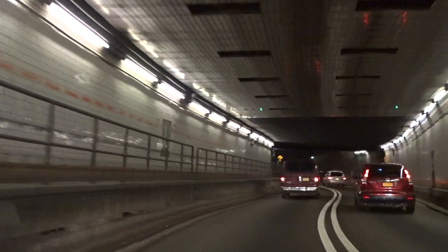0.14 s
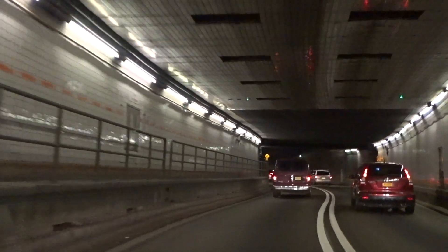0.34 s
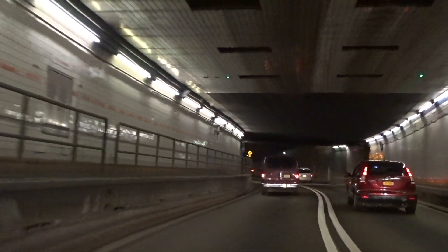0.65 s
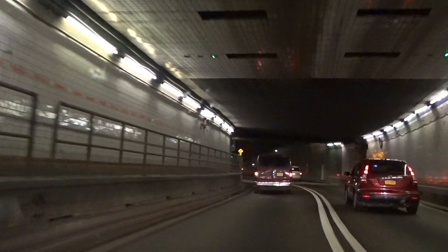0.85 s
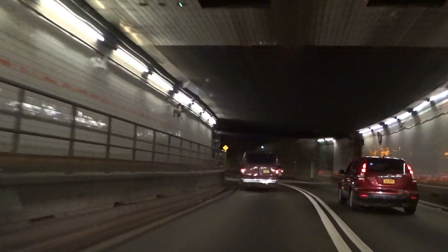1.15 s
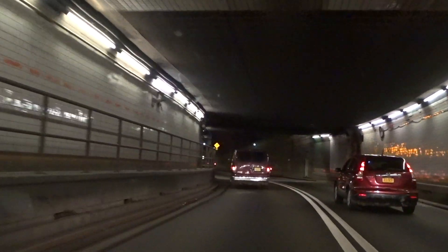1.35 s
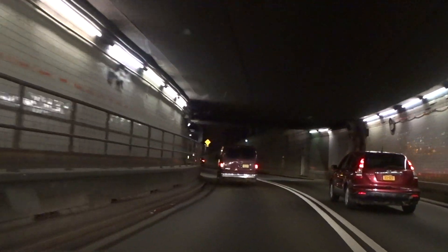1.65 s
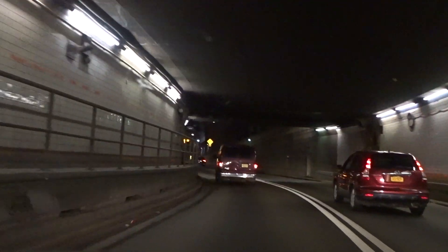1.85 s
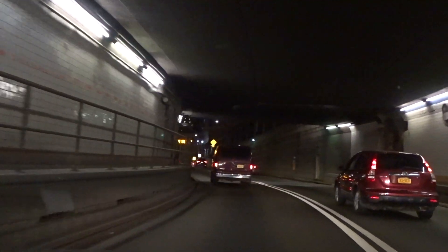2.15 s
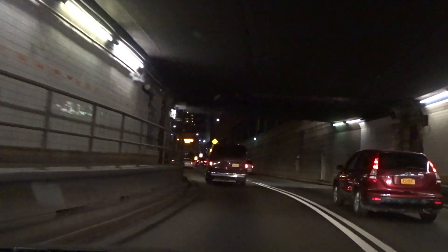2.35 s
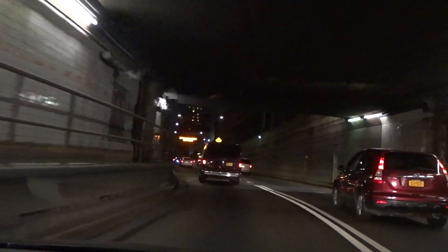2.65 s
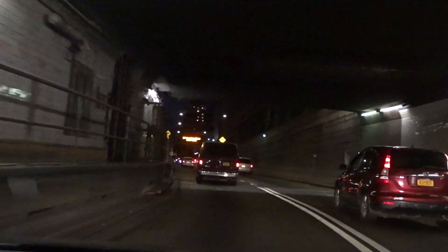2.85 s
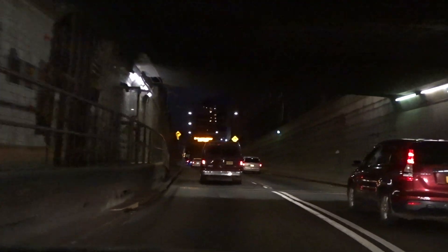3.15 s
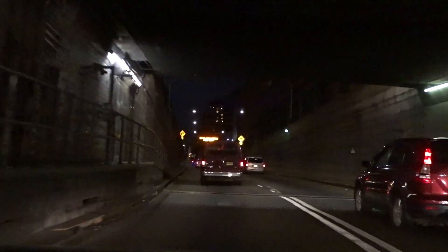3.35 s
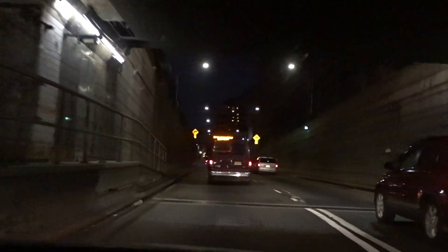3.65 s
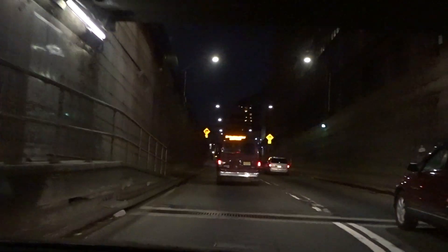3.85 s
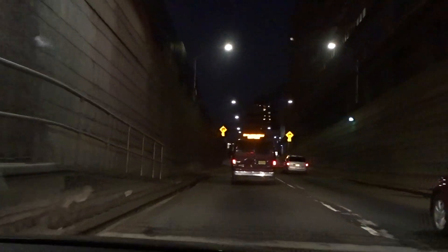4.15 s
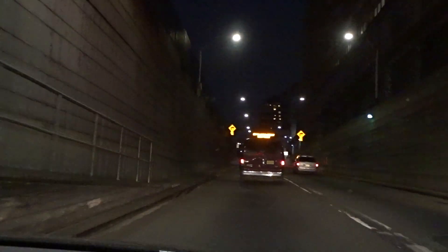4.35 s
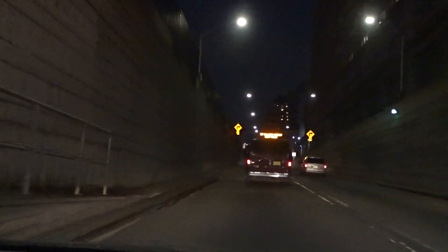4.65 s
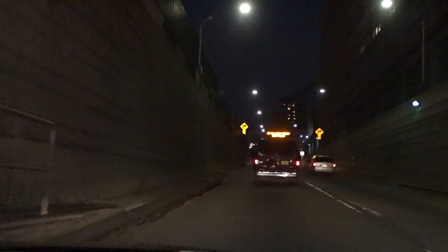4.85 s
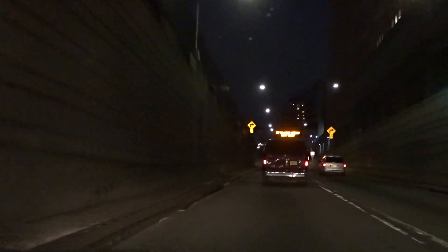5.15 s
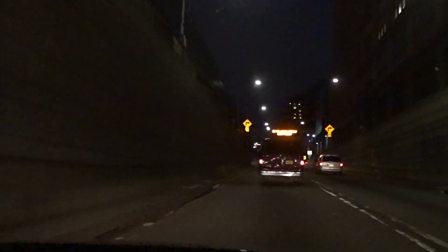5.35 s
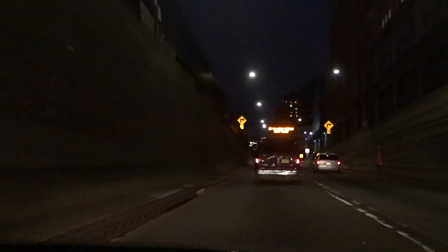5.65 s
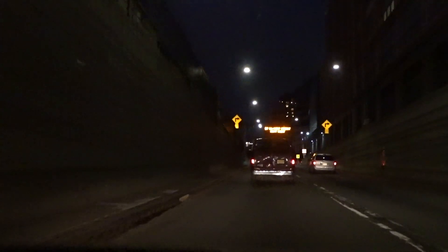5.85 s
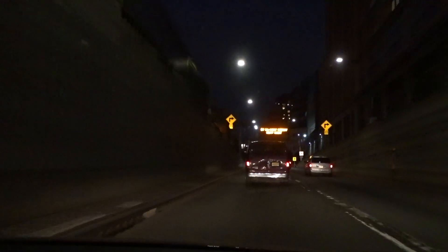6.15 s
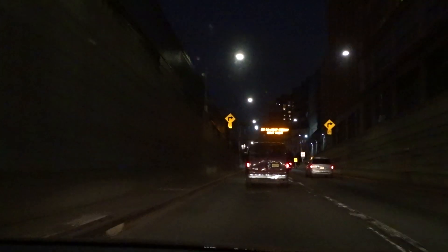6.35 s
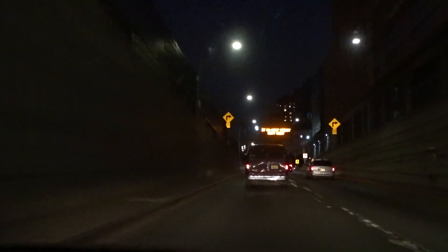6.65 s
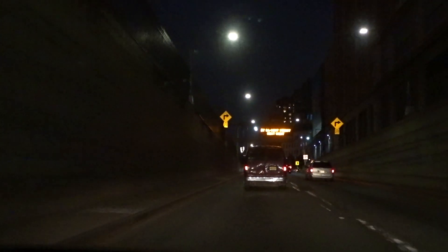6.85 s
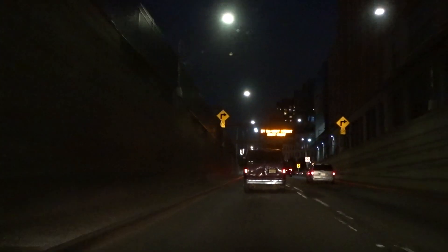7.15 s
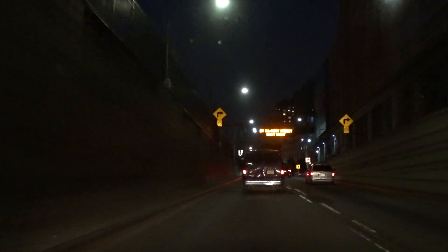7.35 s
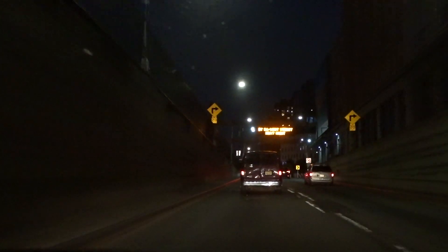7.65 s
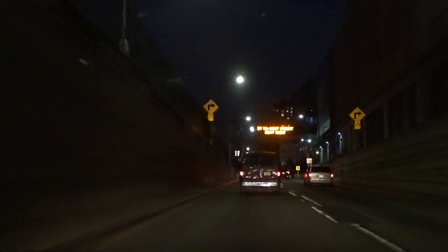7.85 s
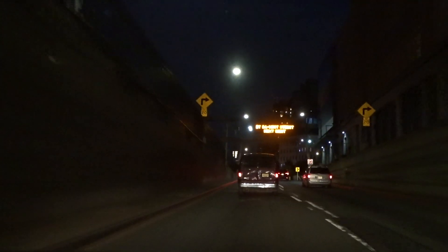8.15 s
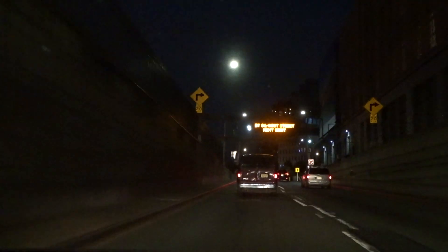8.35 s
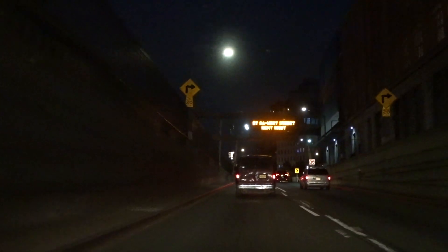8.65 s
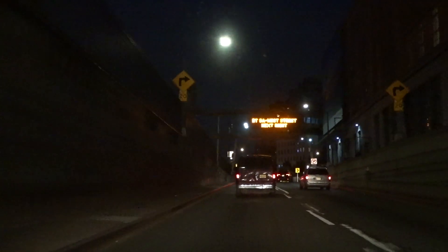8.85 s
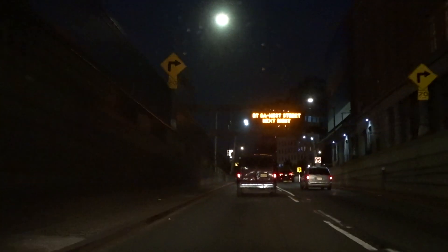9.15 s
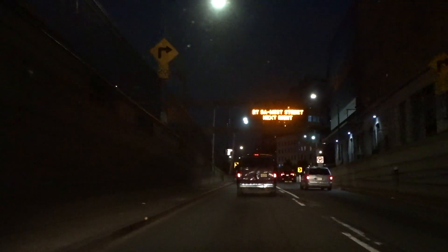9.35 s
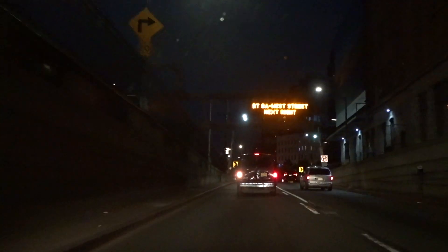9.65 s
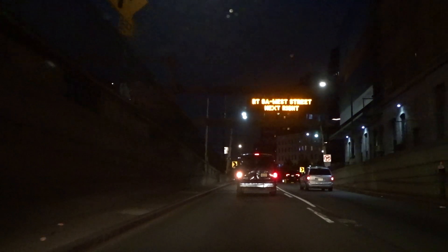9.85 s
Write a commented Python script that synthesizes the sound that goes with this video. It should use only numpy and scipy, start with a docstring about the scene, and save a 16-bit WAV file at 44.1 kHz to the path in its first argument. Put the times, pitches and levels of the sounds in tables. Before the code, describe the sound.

Inside a car leaving a tunnel, low road boom and tyre roar swell, then thud over joints and settle into quieter, duller rumble with faint trim clicks.

```python
"""Road noise booms in the resonances of a car cabin, as shaped noise in levels that follow the paving.
The car leaves a tunnel for an open, walled ramp: wash and hiss, also shaped noise, fall away.
Sine drones give the engine and a low hum; narrow noise gives a roar that blooms and drops, and a gear whine.
Decaying noise thuds over joints, a gated sine zips over a grating, and damped modes click in the plastic trim.
Noise with uneven envelopes rattles, sizzles, squeaks and rustles softly on the dashboard."""
import sys
import numpy as np
from scipy import signal
from scipy.fft import rfft, irfft, next_fast_len
from scipy.io import wavfile
from scipy.ndimage import uniform_filter1d, map_coordinates

SR = 44100
rng = np.random.default_rng(int(sys.argv[2]) if len(sys.argv) > 2 else 0)


def bounce(signal):
    """Save signal as a 16-bit WAV file at the path given by the first command-line argument."""
    frames = np.transpose(np.atleast_2d(signal))
    limited = np.clip(frames, -1, 1)
    pcm = np.round(limited * 32767).astype(np.int16)
    wavfile.write(sys.argv[1], SR, pcm)


N = 440559

TOP_HZ = 11070  # upper band limit of the sound
# the jolt that shakes loose parts
JOLT_S, JOLT_LENGTH_S = 4.68, .4

# hiss spectrum of door seals and dull rubbing: frequency_hz, density_db
HISS_SPECTRUM = [(1500, -33), (2400, -0.5), (2900, 0.5), (3400, 0), (4000, -2), (4500, -7), (5200, -11),
                 (7000, -9), (11000, -29)]
# vibration modes of plastic trim: frequency_hz, level_db, t60_s
TRIM_MODES = [(1264, -5, 0.027), (1610, -5, 0.027), (1970, -1, .025), (2224, 1.5, 0.026),
              (2870, -3.5, 0.033), (3020, -1.5, 0.023), (3590, -7, 0.024), (3950, -4, 0.024),
              (4710, -9.5, .02), (5800, -13.5, 0.018), (7400, -10, 0.021), (8090, -10, 0.021),
              (8730, -6, 0.027), (9500, -13.5, 0.013), (10960, -16, 0.014)]


def amp(db):
    """Level to amplitude ratio: 20 dB is a factor of ten."""
    return 10 ** (np.asarray(db) / 20)


def unit(x):
    """Normalization by effective value: rms becomes 1."""
    return x / np.sqrt(np.mean(x ** 2) + 1e-20)


def along(points, hz):
    """Logarithmic frequency scale: (Hz, value) points joined by lines over log frequency."""
    f, v = np.transpose(points)
    return np.interp(np.log(hz + 1), np.log(f + 1), v)


def curves(rows):
    """Linear interpolation in time: one value per sample for each column after the time."""
    s, *cols = np.transpose(rows)
    return [np.interp(np.arange(N) / SR, s, c) for c in cols]


def wobble(rate):
    """Band-limited random modulation: a smooth curve through rate random knots a second."""
    knots = rng.standard_normal(int(N * rate / SR) + 4)
    return map_coordinates(knots, [np.arange(N) * rate / SR])


def swell(middle, half):
    """Gaussian envelope: 1 at its middle, 1/e at half seconds either side."""
    return np.exp(-((np.arange(N) / SR - middle) / half) ** 2)


def step(middle, fade):
    """Sigmoid transition: a soft change from 0 to 1 with time scale fade."""
    return .5 + .5 * np.tanh((np.arange(N) / SR - middle) / (2 * fade))


def filtered(x, response):
    """Linear filtering: the spectrum of x is multiplied by a response of frequency."""
    size = x.shape[-1]
    m = next_fast_len(size + SR // 2)
    return irfft(rfft(x, m) * response(np.fft.rfftfreq(m, 1 / SR)), m)[..., :size]


def add(track, s, sound):
    """Superposition: a sound is added to the track from time s."""
    part = track[..., round(s * SR):][..., :sound.shape[-1]]
    part += sound[..., :part.shape[-1]]


def peaks(modes, hz):
    """Resonance: gains of (Hz, half width Hz, dB) modes summed in power."""
    gains = [amp(db) / (1 + ((hz - fc) / width) ** 2) for fc, width, db in modes]
    return np.sqrt(sum(gain ** 2 for gain in gains))


def rush(gain):
    """Stereo coherence: shaped noise with a mid part of rms 1 and a side part weighted by frequency."""
    # side relative to mid: frequency_hz, side_minus_mid_db
    side_levels = [(30, -22), (75, -23), (120, -26.5), (230, -18.5), (450, -17), (660, -11), (1000, -12.5),
                   (1400, -8), (2500, -7.5), (5000, -8), (7400, -11), (10500, -4.5)]

    def mid_side_gain(hz):
        """Spectral weighting: mid and side share a colour, and the side takes its own level."""
        return gain(hz) * np.array([np.ones_like(hz), amp(along(side_levels, hz))])

    mid, side = filtered(rng.standard_normal((2, N)), mid_side_gain)
    return np.array([mid + side, mid - side]) / np.std(mid)


def random_ripple(hz, depth_db=1.4, spacing_hz=45):
    """Random spectral ripple: small peaks and dips, drawn afresh for each noise and steady in time."""
    knots = rng.standard_normal(SR // 16)
    ripple = map_coordinates(knots, [hz / spacing_hz], mode="mirror")
    onset = np.clip(hz / 600 - 1, 0, 1)  # none below 600 Hz, full from 1200 Hz
    return amp(depth_db * onset * ripple)


def coloured(spectrum):
    """Spectral shaping: stereo noise follows a given spectrum with a random ripple."""
    return rush(lambda hz: amp(along(spectrum, hz)) * random_ripple(hz))


def even(x, size=SR // 4):
    """Level equalization: division by running rms removes slow chance swells and keeps fast flutter."""
    power = np.abs(uniform_filter1d(np.mean(x ** 2, axis=0), size))
    return x / np.sqrt(power + 1e-12)


def paving():
    """Surface excitation: boom, roar and shake levels (dB) follow the paving under the tyres."""
    # stretches, each lasting until the next: start_s, boom_db, roar_db, shake_db
    stretches = [(0, -26, -29, -38), (2.55, -24, -28.5, -38), (3.75, -21.5, -28, -36),
                 (4.9, -24.5, -31, -31.5), (5.7, -26, -29.5, -36), (6.55, -24, -29, -37),
                 (7.9, -25.2, -29.5, -37.5), (9.1, -24, -28.5, -40.5)]
    blend_s = 0.32  # one surface gives way to the next
    starts, *levels = np.transpose(stretches)
    under = np.maximum(np.searchsorted(starts, np.arange(N) / SR) - 1, 0)
    return uniform_filter1d(np.array(levels)[:, under], round(blend_s * SR))


def road(boom_waver_db=0.72, roar_waver_db=0.73):
    """Forced vibration: rough asphalt shakes the body, rings the cabin air and roars in the tread."""
    # cabin air and tyre cavity resonances: frequency_hz, half_width_hz, level_db
    cavity_modes = [(105.3, 10.5, 0.5), (121, 27.4, 2.5), (164.5, 9.3, 2), (175.2, 20, -0.5),
                    (228.6, 8.2, -1.1), (265.3, 13, -7.5)]
    # body vibration spectrum: frequency_hz, density_db
    body_spectrum = [(8, -20), (18, -5), (27, -4), (36, 4), (43, 7), (56, -4.5), (75, -9.5), (100, -4.5),
                     (160, -58)]
    # tyre roar spectrum: frequency_hz, density_db
    tyre_spectrum = [(150, -56), (215, -8.5), (270, -5), (305, -2.5), (340, -1), (358, 4), (385, -3.5),
                     (420, -3), (455, -4), (510, -9.5), (600, -20.5), (750, -23.5), (1200, -73)]
    # road dips that rock the body: middle_s, level_db
    road_dips = [(1.29, -33.5), (3.42, -29.5), (4.91, -20), (7.9, -32), (9.47, -33), (9.94, -30)]
    rock_s = .06  # half length of one rocking
    boom_db, roar_db, shake_db = paving()
    rocking = sum(amp(db) * swell(s, rock_s) for s, db in road_dips)
    boom = amp(boom_db + boom_waver_db * wobble(4)) * even(rush(lambda hz: peaks(cavity_modes, hz)))
    shaking = np.hypot(amp(shake_db), rocking) * even(coloured(body_spectrum))
    roar = amp(roar_db + roar_waver_db * wobble(4)) * even(coloured(tyre_spectrum))
    return boom + shaking + roar


def drone(pitch, gain, waver_db, drift_hz):
    """Periodic tone: a sine of rms gain wavers in level and drifts in frequency."""
    phase = 2 * np.pi * np.cumsum(pitch + drift_hz * wobble(9)) / SR
    return np.sqrt(2) * gain * amp(waver_db * wobble(6)) * np.sin(phase)


def engine():
    """Firing frequency: the car's own engine hums in and out of the road boom."""
    # firing tone: time_s, pitch_hz, level_db
    firing = [(0, 102.8, -32.5), (.95, 100, -27), (1.6, 101.3, -34), (3, 106.6, -35.5), (4.1, 105.8, -31.5),
              (5.1, 102.3, -41), (6.1, 105.1, -28), (8.1, 105.1, -43.5), (8.65, 95.2, -26.5),
              (9, 100.2, -43), (9.28, 107, -28), (10, 109, -44)]
    pitch, level = curves(firing)
    return drone(pitch, amp(level), waver_db=2, drift_hz=1.83)


def thuds(attack_s=0.011, spread=0.54, left_db=1.8):
    """Impact and damping: a wheel meets a joint and the suspension shudders, stronger on the left."""
    # joint impacts, before doubling and stereo balance: start_s, level_db, pitch_hz, t60_s
    joints = [(3.921, -15.5, 160, 0.2), (4.271, -23, 158, 0.3), (4.699, -17.5, 114, 0.44),
              (4.907, -18, 65.4, 0.22)]
    out, t = np.zeros(N), np.arange(SR // 2) / SR
    for s, db, pitch, t60 in joints:
        def band(hz):
            """Broad resonance: the half-gain width is a fraction of its pitch."""
            return 1 / (1 + ((hz - pitch) / (spread * pitch)) ** 4)

        shudder = even(filtered(rng.standard_normal(len(t)), band)[None], size=SR // 20)[0]
        envelope = amp(db - 60 * t / t60) * (1 - np.exp(-t / attack_s))
        add(out, s, 2 * envelope * shudder)
    return out * amp([[left_db], [-left_db]])


def grating(level_db=-26.0):
    """Passage frequency: evenly spaced steel bars make the tread sing at the bar rate."""
    start_s, length_s, bar_hz, edge_s = 4.601, .031, 803, .003
    t = np.arange(N) / SR - start_s
    contact = np.clip(np.minimum(t, length_s - t) / edge_s, 0, 1)
    return amp(level_db + wobble(370)) * contact * np.sin(2 * np.pi * bar_hz * t)


def blooming_roar():
    """Resonant swell: a roar near 230 to 540 Hz blooms by the tunnel mouth and drops as the roof ends."""
    # roar resonances, the lowest a cabin mode that the tunnel excites:
    # frequency_hz, half_width_hz, level_db
    roar_modes = [(230, 8.3, 2.5), (269, 35, -7.5), (383.5, 28, 2), (452, 23, -2), (544, 49, -10.5)]
    peak_s, rise_s, fall_s, peak_db = 2.84, 0.78, 0.28, -26.5
    hum_s, hum_half_s, hum_hz, hum_db = 2.5, 0.38, 67.2, -35.5
    t = np.arange(N) / SR - peak_s
    attenuation = np.hypot(1, t / np.where(t < 0, rise_s, fall_s))  # 1 at the loudest moment
    roar = amp(peak_db) / attenuation * even(rush(lambda hz: peaks(roar_modes, hz)))
    # a low hum swells with it
    hum_gain = amp(hum_db) * swell(hum_s, hum_half_s)
    return roar + drone(hum_hz, hum_gain, waver_db=-0.5, drift_hz=.7)


def ticks(start, length, db, colour, count, scatter_db=2):
    """Stratified chance: one faint contact falls at random in each equal slice, as a click row."""
    return [(start + (k + when) * length / count, db + scatter_db * (2 * force - 1), *colour)
            for k, (when, force) in enumerate(rng.random((count, 2)))]


def contacts():
    """Random impacts: the clear clicks, stray ticks along the drive and a flurry after the jolt."""
    # trim contacts, level being rms of the first 4 ms:
    # start_s, level_db, favoured_hz, fall_db_per_octave, crack_t60_s
    clear = [(.1625, -43, 5000, -1, 0.018), (.1786, -17.5, 3300, 2.5, .013), (1.913, -46, 7000, 13, .025),
             (1.963, -52, 9000, 31, .03), (2.525, -38, 3500, 13, .011), (2.5337, -33, 3460, 16.5, .01),
             (2.9948, -42.5, 2800, 5.5, .027), (3.878, -49.5, 7000, 5, .025),
             (4.449, -47.5, 4800, 11, .012), (4.644, -33, 5800, 7, .04), (4.6756, -44.5, 6000, 8, 0.01),
             (4.7144, -35.5, 6470, 2, 0.044), (4.782, -47, 4800, 9, .015), (4.823, -44, 5960, 7, .015),
             (4.9408, -42.5, 6460, 3, 0.054), (4.962, -35.5, 6800, 19.5, 0.048),
             (5.811, -46, 2000, 10, .066), (7.7924, -49.5, 4570, 11, .014), (8.076, -42, 6800, 1.5, .022),
             (8.58, -50, 6200, 5.5, .018), (9.269, -52, 6500, 10, .016), (9.5483, -42.5, 2500, 4, .012)]
    # colours: favoured Hz, fall in dB per octave, crack t60 in s
    stray = ticks(0, N / SR, -52, (7000, 12.5, .022), count=8)
    flurry = ticks(JOLT_S, JOLT_LENGTH_S, -52.5, (6000, 1, .012), count=9)
    return list(clear) + stray + flurry


def plastic(hz):
    """Spectral envelope with absorption: a crack follows the trim modes, less a narrow notch."""
    notch_hz, notch_width_hz, notch_db = 4840, 420, -3
    notch = notch_db * np.exp(-((hz - notch_hz) / notch_width_hz) ** 2)
    envelope = [(700, -42)] + [row[:2] for row in TRIM_MODES]
    return amp(along(envelope, hz) + notch) * (hz < TOP_HZ)


def trim(crack_db=6, tail_db=-14, tail_t60=0.086, side_db=-7, attack_s=0.00025):
    """Modal ringing: contacts excite damped plastic modes, a crack and the cabin's brief answer."""
    out, t = np.zeros((2, N)), np.arange(SR // 8) / SR
    hz, level, t60 = np.transpose(TRIM_MODES)[:, :, None]
    for s, db, centre, fall, crack_t60 in contacts():
        # the offset from rng is a phase in cycles, a fraction of a turn
        modes = amp(level - 60 * t / t60) * np.sin(2 * np.pi * (hz * t + rng.random(hz.shape)))
        ring = np.sum(modes, axis=0)
        fade = amp(crack_db - 60 * t / crack_t60) + amp(tail_db - 60 * t / tail_t60)
        mid, side = fade * unit(filtered(rng.standard_normal((2, len(t))), plastic))
        pair = ring + mid + amp(side_db) * np.array([side, -side])
        pair = pair * (1 - np.exp(-t / attack_s))
        # small, hard parts favour the high modes, large ones the low
        pair = filtered(pair, lambda f: amp(-fall * np.abs(np.log2((f + 1) / centre))))
        add(out, s, amp(db) * pair / np.std(pair[:, :SR // 250]))
    return out


def jolt_rattle(level_db=-53.0, grain_db=5.0, taper=0.33):
    """Dense impacts merge into noise: the joint shakes loose parts into a grainy rattle."""
    # frequency_hz, density_db
    spectrum = [(900, -23), (2000, 4), (3200, -6), (5000, -10), (7000, -8.0), (11000, -20.5)]
    envelope = np.zeros((2, N))
    add(envelope, JOLT_S, signal.windows.tukey(round(JOLT_LENGTH_S * SR), taper)[None])
    grains = unit(amp(grain_db * wobble(330)))
    return amp(level_db) * envelope * grains * coloured(spectrum)


def leaving(tunnel_db, open_db):
    """Equal-power crossfade: gains of tunnel and open-air parts as the car drives out."""
    exit_s, fade_s = 4.45, 0.39  # middle and time scale
    out = step(exit_s, fade_s)
    return amp(tunnel_db) * np.sqrt(1 - out), amp(open_db) * np.sqrt(out)


def outside(flutter_db=0.48, follow=0.65):
    """Transmission: wall-reflected wash enters by glass and seals; outdoors it follows the tyre roar."""
    # wash spectrum in the tunnel: frequency_hz, density_db
    tunnel_spectrum = [(350, -17.5), (560, -2.5), (680, -2), (820, 0.5), (1000, -1.5), (1150, -3.5),
                       (1320, -10.5), (1600, -14.5), (2000, -18), (2500, -22.5), (3200, -39.5),
                       (5000, -58.5)]
    # wash spectrum in the open: frequency_hz, density_db
    open_spectrum = [(350, -26), (560, 0), (680, 0.5), (820, -0.5), (1000, -1), (1150, -3.5), (1320, -10.5),
                     (1600, -14), (2000, -16.5), (2500, -23.5), (3200, -30), (5000, -61.5)]
    tunnel, ramp = leaving(tunnel_db=-35.2, open_db=-40.5)
    roar_db = paving()[1]
    ramp = ramp * amp(follow * (roar_db - roar_db.mean()))
    air = np.hypot(*leaving(tunnel_db=-54.5, open_db=-62.5))
    wash = tunnel * coloured(tunnel_spectrum) + ramp * coloured(open_spectrum)
    return amp(flutter_db * wobble(14)) * (wash + air * coloured(HISS_SPECTRUM))


def squeaks(half_width_hz=420, grain_db=4):
    """Stick-slip friction: plastic rubs plastic in a thin, grainy whistle of narrow-band noise."""
    # rubs of plastic: start_s, length_s, level_db, pitch_hz
    slips = [(0.035, 0.12, -63.5, 8900), (0.035, .09, -59.5, 6900), (2.04, .08, -55.5, 9060),
             (2.164, .14, -63.5, 10100), (5.734, 0.073, -61.5, 8960), (5.741, 0.055, -62, 5700)]
    out = np.zeros(N)
    for s, length, db, pitch in slips:
        envelope = signal.windows.tukey(round(length * SR))
        whistle = filtered(rng.standard_normal(SR // 4), lambda hz: peaks([(pitch, half_width_hz, 0)], hz))
        add(out, s, amp(db) * envelope * unit(whistle)[:len(envelope)])
    return out * amp(grain_db * wobble(250))


def whine(half_width_hz=4, pitch_hz=679):
    """Narrow-band noise: a faint, fuzzy gear tone rises out of the noise and sinks again."""
    middle_s, half_s, level_db = 8.1, 2.1, -49
    tone = rush(lambda hz: peaks([(pitch_hz, half_width_hz, 0)], hz))
    return amp(level_db) * swell(middle_s, half_s) * tone


def rustle(grain_db=1.2, clump_db=1, body_db=-2):
    """Sliding friction: grainy rubbing on the dashboard; each slide swells it and adds duller hiss."""
    # rubbing spectrum: frequency_hz, density_db
    rub_spectrum = [(3000, -27), (4800, -9), (5400, -2), (5900, -0.5), (6500, -7.5), (7300, 1.5),
                    (8000, 2.5), (8600, 0), (9400, -2), (11000, -8.5)]
    # dashboard slides: middle_s, half_length_s, level_db
    rubs = [(1.39, 0.16, -59.5), (2.18, 0.3, -56), (2.85, .2, -61), (3.31, 0.2, -58.5),
            (4.848, 0.44, -56.5), (5.927, 0.16, -60), (8.15, 0.69, -65.5)]
    slides = sum(amp(db) * swell(s, half) for s, half, db in rubs)
    rest = np.hypot(*leaving(tunnel_db=-64, open_db=-67.5))  # faint grain between slides
    rubbing = np.hypot(rest, slides) * coloured(rub_spectrum)
    rubbing = rubbing + amp(body_db) * slides * coloured(HISS_SPECTRUM)
    return amp(grain_db * wobble(160) + clump_db * wobble(22)) * rubbing


def chatter(grain_db=4.5):
    """Vibration-driven contact: a loose panel sizzles in uneven bursts, more once shaken free."""
    # panel resonances: frequency_hz, half_width_hz, level_db
    panel_modes = [(3420, 150, 7.5), (6050, 240, 0.5), (8500, 230, -0.5)]
    calm_db, shaken_db, shaken_s, rise_s = -73.5, -69.5, 7.4, .1
    level = calm_db + (shaken_db - calm_db) * step(shaken_s, rise_s)
    return amp(level + grain_db * wobble(70)) * rush(lambda hz: peaks(panel_modes, hz))


def scene():
    """Superposition: all sources add as heard behind the windscreen."""
    driving = road() + engine() + thuds() + grating() + blooming_roar() + outside() + whine()
    return driving + trim() + jolt_rattle() + squeaks() + rustle() + chatter()


def record(dry):
    """Band limiting: nothing is kept from the upper limit upwards."""
    return filtered(dry, lambda hz: hz < TOP_HZ)


dry = scene()
out = record(dry)
bounce(out)
```